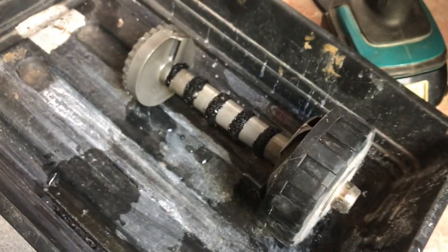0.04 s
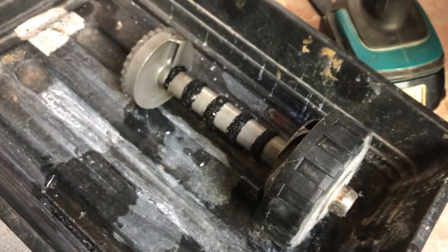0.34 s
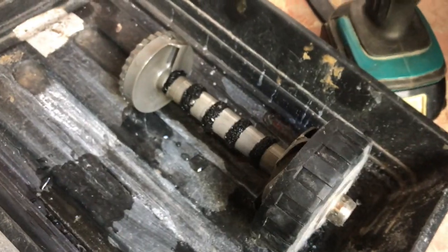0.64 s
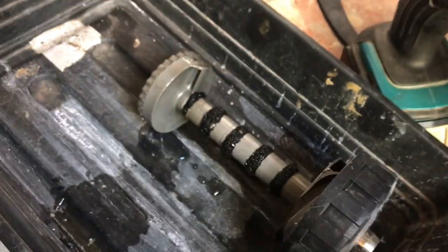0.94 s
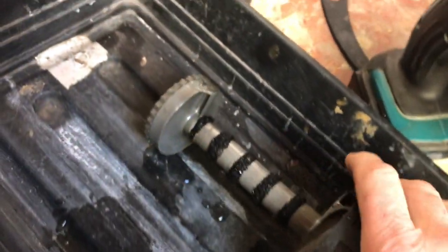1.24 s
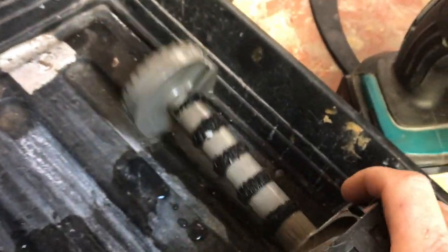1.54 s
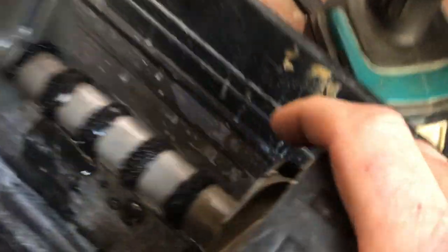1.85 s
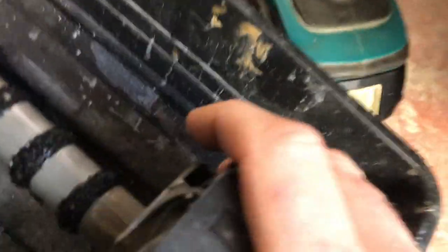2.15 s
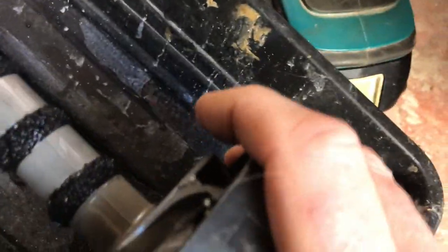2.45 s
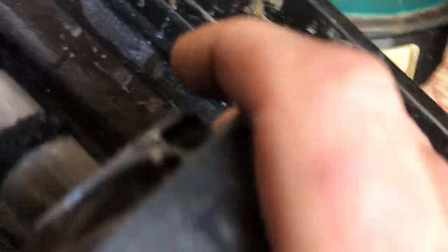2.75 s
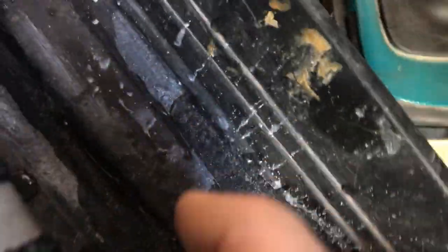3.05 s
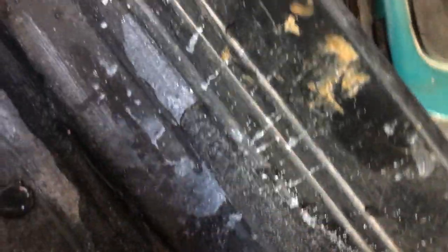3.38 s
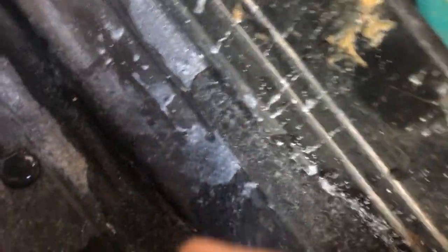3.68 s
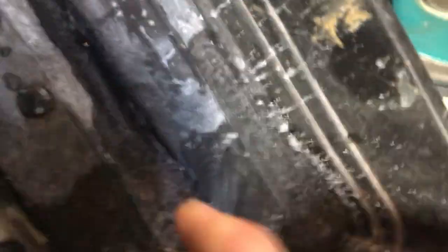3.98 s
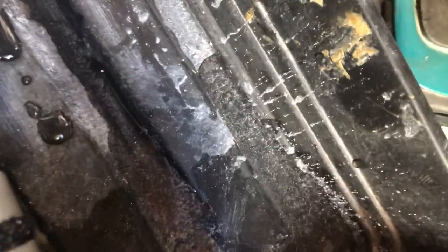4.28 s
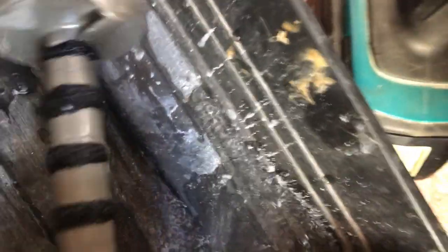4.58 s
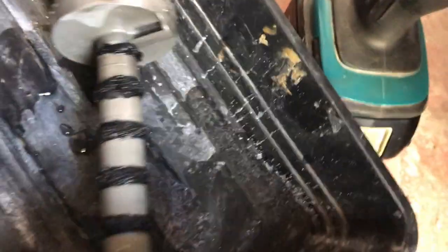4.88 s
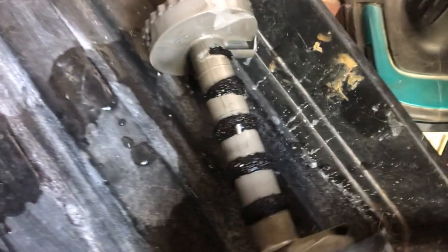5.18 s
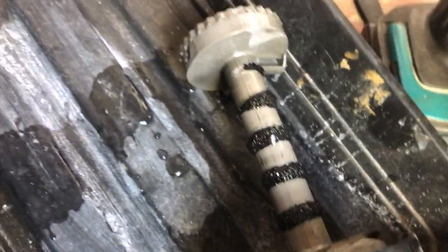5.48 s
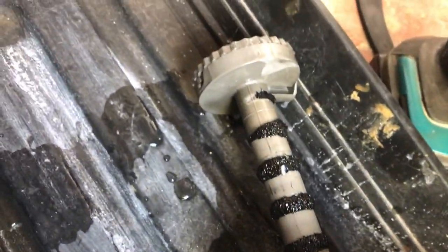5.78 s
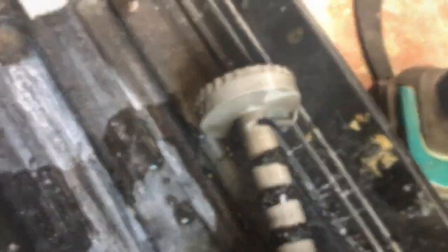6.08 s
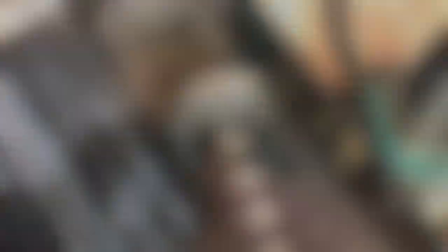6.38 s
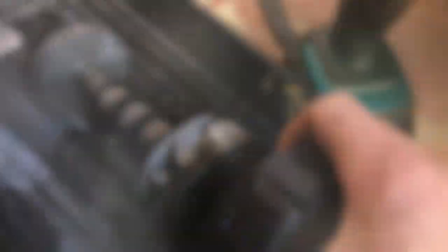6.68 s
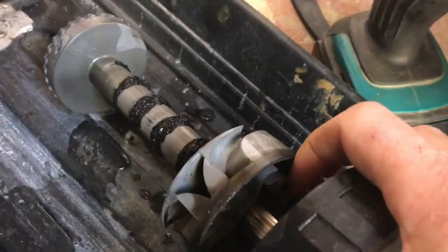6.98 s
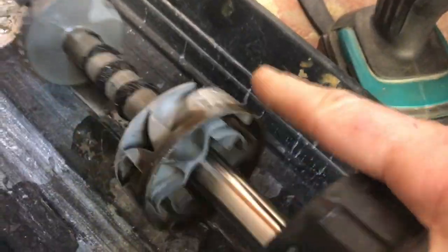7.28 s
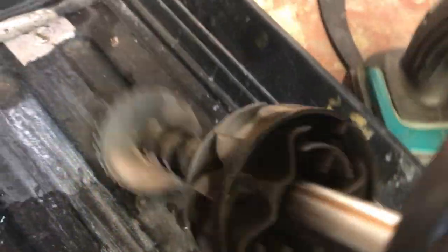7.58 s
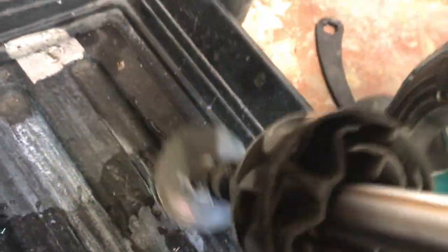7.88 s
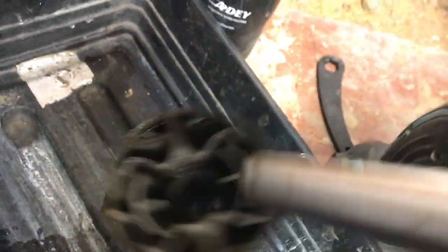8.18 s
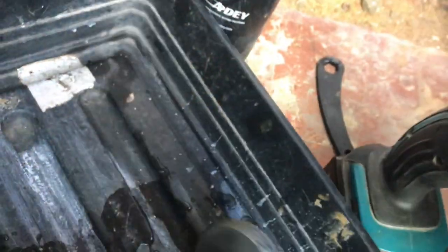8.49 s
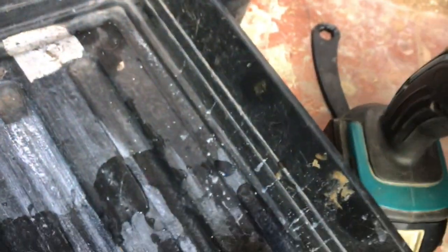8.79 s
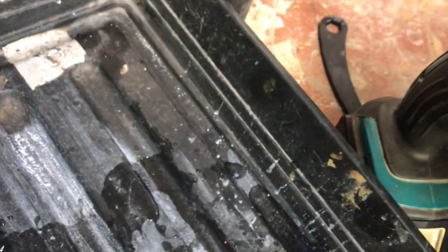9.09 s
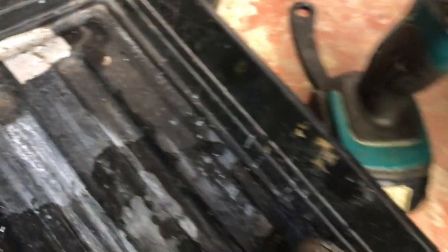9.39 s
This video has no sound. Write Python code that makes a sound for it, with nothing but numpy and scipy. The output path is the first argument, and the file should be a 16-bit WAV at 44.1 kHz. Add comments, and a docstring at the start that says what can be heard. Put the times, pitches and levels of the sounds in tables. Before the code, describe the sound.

Plastic and metal parts are pulled apart by hand, knocking, scraping and clattering in a hollow plastic tray.

```python
"""Hard parts knock and bounce in a wet plastic tray, whose walls thump and ring, as a filter's metal
shaft, toothed plastic wheel and cap are pulled apart by hand, close to the microphone.
The wheel taps hollowly as it rocks. Between the blows the parts slide, catch, rub, squeak and click.
A small room adds a short tail to the blows and a low rumble behind everything."""
import sys
import numpy as np
from scipy import signal
from scipy.fft import rfft, irfft
from scipy.io import wavfile
from scipy.ndimage import uniform_filter1d

SR = 44100
rng = np.random.default_rng(int(sys.argv[2]) if len(sys.argv) > 2 else 0)


def unload_wav(signal):
    """Save mono or channel-first audio to the path in sys.argv[1] as 16-bit WAV at rate SR, clipped to [-1, 1]."""
    wavfile.write(
        sys.argv[1],
        SR,
        np.round(np.clip(np.atleast_2d(signal).T, -1, 1) * 32767).astype(np.int16),
    )


N = 416304
TIME = np.arange(N) / SR

# Parts hitting the tray and each other. Thump (lows) and crack (highs) are added to the knock level.
# (time [s], knock level [dB], wall thump [dB], crack [dB])
BLOWS = [(1.498, -22.5, -16.5, -32), (2.034, -27, -2, -43.5), (2.502, -56, 10.5, -24),
         (3.332, -51, 15.5, -48), (3.843, -51.5, 11.5, -52), (3.9964, -11.5, -5.5, -29),
         (4.053, -14.5, -9.5, -32), (4.070, -15.5, -6.5, -28), (4.146, -14, -12.5, -32.5),
         (4.289, -18.5, -3.5, -31.5), (4.576, -13.5, -5, -32.5), (4.614, -10, -3, -33),
         (4.638, -9.5, -13.5, -27.5), (4.657, -15.5, -8.5, -27), (4.668, -3.5, -9, -50),
         (4.684, -6, -10.5, -20.5), (4.706, -11.5, -8, -27.5), (4.735, -14.5, -12, -42.5),
         (5.153, -18, -9.5, -22), (5.173, -12.5, -14, -20.5), (5.202, -12.5, -7, -22),
         (5.242, -21, -9, -25.5), (5.262, -20.5, -1, -26), (5.321, -19.5, -13.5, -12.5),
         (6.386, -27.5, -15.5, -39.5), (6.457, -32.5, -18, -42), (6.621, -24, -18.5, -28.5),
         (7.236, -25.5, -20.5, -51.5), (7.566, -15.5, -18, -40), (8.024, -32.5, -17.5, -11.5),
         (8.114, -22.5, -23.5, -21.5), (8.164, -7.5, -11.5, -18.5), (8.175, -6.5, -18, -22.5),
         (8.185, -7.5, -20, -26), (8.219, -21, -6, -28), (8.307, -5, -17, -16), (8.338, -10, -9, -29),
         (8.350, -11.5, -15.5, -27), (8.381, -8.5, -17, -21.5), (8.409, -15.5, -17, -29),
         (8.497, -14.5, -11, -20.5), (8.528, -24.5, -0.5, -8), (8.558, -9, -18, -27.5),
         (8.637, -24.5, 0, -22), (8.781, -31, 2.5, -45), (8.882, -28, -4, -8), (8.982, -14, -3, -9),
         (9.054, -14.5, -6.5, -23), (9.11, -6, -14, -31), (9.171, -27.5, -6.5, -34.5)]
# One blow, octave by octave. A fade time is how long a sound takes to drop by 60 dB.
# (frequency [Hz], level [dB], fade time of the part [s], fade time of tray and room [s])
BLOW_OCTAVES = [(79.8, -11.5, 0.12, 0.44), (180.8, -5.5, 0.05, 0.8), (358.4, -3.5, 0.1, 0.44),
                (750.7, -8, 0.043, 0.34), (1382, -8.5, 0.061, 0.19), (2628, -2.5, 0.039, 0.19),
                (5570, 2, 0.035, 0.085), (12060, -4, 0.032, 0.1)]


def blows(tail_db=-16, tone_db=7, spike=4.0, contact_s=0.0016, chatter=0.089, rebound_db=-15):
    """Each hit is a sharp spike and a short burst that shakes the tray; the low notes linger."""
    out, t = np.zeros(N), TIME[:SR // 5]
    times, knock_db, thump_db, crack_db = np.transpose(BLOWS)
    # harder blows rattle for longer and bounce back more strongly
    stretch = undb(chatter * (knock_db - knock_db.mean()))
    rebound_gain = undb(rebound_db) * stretch ** 2
    rebound_s = rng.uniform(.005, .016, len(times))
    tray_ring = tray(signal.unit_impulse(len(t)))
    for hz, db, part_fade_s, room_fade_s in BLOW_OCTAVES:
        decay = fade(t, part_fade_s * stretch[:, None])
        tail = undb(tail_db) * fade(t, room_fade_s)
        bursts = rng.standard_normal(decay.shape) * (decay + tail)
        bursts[:, 0] += spike
        # each spot favours one note per octave; plastic deadens the high ones to a dry clack
        note_hz = hz * 2 ** (rng.random((len(times), 1)) - .5)
        note = undb(tone_db) * np.sqrt(hz / SR) * np.cos(2 * np.pi * note_hz * t)
        bursts += note * decay / (1 + (note_hz / 3200) ** 4)
        # the lowest band reaches down into the deep bass
        low_hz = hz / 2 if hz == BLOW_OCTAVES[0][0] else hz / np.sqrt(2)
        high_hz = min(hz * np.sqrt(2), SR / 2 - 1)
        band = signal.butter(3, [low_hz, high_hz], "band", fs=SR, output="sos")
        body = signal.sosfilt(band, tray_ring)
        rings = signal.fftconvolve(bursts, body[None], axes=1)[:, :len(t)]
        peak_power = uniform_filter1d(rings ** 2, int(contact_s * SR), axis=1).max(axis=1)
        rings /= np.sqrt(peak_power)[:, None]
        # each blow's thump sets its low octaves; its crack sets the highs, the top octave most
        thump_share = np.interp(hz, [380, 680], [1, 0])
        crack_share = np.interp(hz, [800, 2880, 5760, 11520], [0, 0.58, 1, 1.15])
        gains = undb(db + knock_db + thump_share * thump_db + crack_share * crack_db)
        for k, start in enumerate(times):
            add(out, start, gains[k] * rings[k])
            other_spot = rings[k - len(times) // 2]
            add(out, start + rebound_s[k], gains[k] * rebound_gain[k] * other_spot)
    return out


# The notes of the tray with the parts in it. (pitch [Hz], width [Hz], level [dB])
TRAY_NOTES = [(125.4, 25, 13), (176, 26, 9.5), (234.7, 10, 9), (310, 75, 3.5), (611, 64, 7.5),
              (711.4, 8.4, 5.5), (776, 14, -0.5), (998, 240, -2), (1163, 15, 1.5)]


def tray(shaking):
    """The tray rings at its own notes on top of whatever shakes it."""
    ringing = sum(undb(db) * resonate(shaking, hz, hz / width) for hz, width, db in TRAY_NOTES)
    return tray_echo(shaking) + ringing


def tray_echo(sound, round_trip_s=.00285, trip_db=-10):
    """The upper midrange bounces between the tray's ends, weaker each trip, and sounds hollow."""
    upper = signal.lfilter(*signal.butter(1, [800, 5000], "band", fs=SR), sound)
    lag = int(round_trip_s * SR)
    echo = undb(trip_db) * signal.unit_impulse(lag + 1, lag)
    return sound + signal.lfilter(echo, signal.unit_impulse(lag + 1) - echo, upper)


# The toothed wheel rocking and jolting. (time [s], level [dB])
WHEEL_TAPS = [(4.787, -23.5), (4.847, -22.5), (4.874, -25.5), (4.933, -24.5), (4.959, -28), (5.004, -34.5),
              (5.265, -22), (5.294, -19), (5.439, -32.5), (7.328, -19.5), (7.384, -12), (7.475, -22.5),
              (7.677, -18), (8.351, -12), (8.44, -15), (8.511, -12), (8.677, -23.5)]
# The notes the wheel rings with. (pitch [Hz], level [dB])
WHEEL_NOTES = [(600, 5), (770, 10), (1100, 0.5), (1500, -11.5), (2150, -16), (3000, -21.5)]


def wheel_taps(ring_cycles=36, detune=0.063, spread_db=3.5, click_db=-10, click_fade_s=0.035):
    """The wheel rings hollow when it taps or catches; each spot gives a slightly different chord."""
    out, t = np.zeros(N), TIME[:SR // 5]
    hz, db = np.transpose(WHEEL_NOTES)
    dull = signal.butter(2, 2200, fs=SR)
    rocking = [(start, tap_db, 1) for start, tap_db in WHEEL_TAPS]
    for start, tap_db, pitch_ratio in rocking + catches():
        note_hz = pitch_ratio * rng.normal(hz, detune * hz)[:, None]
        notes = np.sin(2 * np.pi * note_hz * t) * fade(t, ring_cycles / note_hz)
        ring = undb(rng.normal(db, spread_db)) @ notes
        burst = rng.standard_normal(len(t)) * fade(t, click_fade_s)
        click = undb(click_db) * signal.lfilter(*dull, burst)
        add(out, start, undb(tap_db) * (ring / abs(ring).max() + click))
    return out


# The cap sliding off the shaft, one list per pull. (time [s], scrape level [dB], grit level [dB])
CAP_PULLS = [
    [(7.25, -56, -65.5), (7.31, -39.5, -47.5), (7.345, -22.5, -37.5), (7.385, -36.5, -41.5),
     (7.42, -41.5, -58), (7.5, -40.5, -59.5), (7.555, -66, -59)],
    [(7.558, -34, -51), (7.6, -36, -53.5), (7.655, -28.5, -40.5), (7.71, -36, -47.5), (7.75, -62, -68)],
]
# Parts sliding on the tray floor, one list as they are set down and one as they are lifted out.
# (time [s], scrape level [dB], grit level [dB])
FLOOR_SLIDES = [
    [(4.5, -51, -61), (4.77, -47, -56), (4.82, -53.5, -68.5), (5.4, -56.5, -67)],
    [(8.32, -40, -63), (8.562, -41, -66), (8.744, -46.5, -64), (9.28, -51, -74)],
]
# Short rubs of fingers and parts. (time [s], length [s], scrape level [dB], grit level [dB])
RUBS = [(0.635, 0.18, -64, -61.5), (0.818, 0.22, -61.5, -64), (1.28, 0.086, -62, -60.5),
        (1.312, 0.21, -53, -71.5), (1.468, 0.037, -33.5, -65), (3.362, 0.09, -55, -56.5),
        (3.779, 0.45, -63.5, -57.5), (4.532, 0.15, -28.5, -41.5), (6.862, 0.14, -57, -65.5),
        (8.877, 0.11, -51, -49.5), (8.949, 0.055, -31.5, -41), (9.092, 0.023, -24.5, -31.5)]
# The tone of the dull scrape. (frequency [Hz], level [dB])
SCRAPE_TONE = [(80, -20.5), (300, 4), (720, 8), (1200, 4), (2100, 0.5), (3100, -9.5), (6000, -14),
               (16000, -55.5)]
# The tone of the bright grit. (frequency [Hz], level [dB])
GRIT_TONE = [(1000, -3.5), (2500, 3.5), (5300, -3.5), (8000, -4.5), (16000, -9.5)]


def sliding(slips_per_s=1700, uneven_db=4.0, scrape_trim_db=-3, rasp_hz=5500, rasp_db=3):
    """Many tiny, uneven slips shake the tray while grit rasps where the plastic touches."""
    scrape_gain, grit_gain = np.zeros((2, N))
    for slide in [*CAP_PULLS, *FLOOR_SLIDES]:
        times, scrape_db, grit_db = np.transpose(slide)
        scrape_gain += undb(np.interp(TIME, times, scrape_db, left=-np.inf, right=-np.inf))
        grit_gain += undb(np.interp(TIME, times, grit_db, left=-np.inf, right=-np.inf))
    for start, length, scrape_db, grit_db in RUBS:
        stroke = np.hanning(int(length * SR))
        add(scrape_gain, start, undb(scrape_db) * stroke)
        add(grit_gain, start, undb(grit_db) * stroke)
    pressure = undb(uneven_db * wander(120))
    slips = (rng.random(N) < slips_per_s / SR) * rng.uniform(-1.3, 1, N) * pressure
    scrape = unit(tray(colour(slips, SCRAPE_TONE)))
    # the finest roughness blurs into a chattering hiss with one rasping note
    hiss = tray_echo(colour(rng.standard_normal(N) * pressure, GRIT_TONE))
    grit = unit(hiss + undb(rasp_db) * resonate(hiss, rasp_hz, sharpness=12))
    return undb(scrape_trim_db) * scrape_gain * scrape + grit_gain * grit


def catches(per_slide=36, boost_db=7, pull_rise_per_s=1.41):
    """Sliding parts snag again and again. Lists wheel taps as (time [s], level [dB], pitch [ratio])."""
    rows, first_pull_s = [], CAP_PULLS[0][0][0]
    for slides, rise in (CAP_PULLS, pull_rise_per_s), (FLOOR_SLIDES, 0):
        for slide in slides:
            times, scrape_db, _ = np.transpose(slide)
            progress = (np.arange(per_slide) + rng.random(per_slide)) / per_slide
            for start in times[0] + (times[-1] - times[0]) * progress:
                # louder with the scrape, and higher as the shaft draws out
                level_db = np.interp(start, times, scrape_db) + boost_db
                rows.append((start, level_db, 1 + rise * (start - first_pull_s)))
    return rows


# Edges catching and slipping. (time [s], length [s], pitch [Hz], level [dB])
SQUEAKS = [(2.61, 0.063, 1275, -59), (2.801, 0.093, 1175, -65.5), (4.609, 0.0052, 7750, -19.5),
           (7.367, 0.012, 5670, -27.5), (7.370, 0.016, 3015, -27.5), (8.173, 0.013, 4380, -15.5)]


def squeaks(jitter=0.16, overtone_db=-7):
    """An edge sticks and slips so fast that it gives a rough, high note."""
    out = np.zeros(N)
    for start, length, hz, db in SQUEAKS:
        count = int(length * SR)
        shaky_hz = hz * (1 + jitter * wander(3000)[:count])
        phase = 2 * np.pi * np.cumsum(shaky_hz) / SR
        swell = np.sin(np.pi * np.sqrt(np.arange(count) / count))
        add(out, start, undb(db) * swell * (np.sin(phase) + undb(overtone_db) * np.sin(2 * phase)))
    return out


# Light clicks of the parts, clear of the tray. (time [s], level [dB], ring compared with snap [dB])
CLICKS = [(1.73, -60.5, -17), (1.913, -48.5, -26), (2.855, -55, -32), (3.455, -62.5, -9.5),
          (5.692, -35, -44), (5.814, -36, -9.5), (5.968, -53.5, -19), (6.318, -57.5, -25),
          (6.666, -44.5, -26), (7.078, -57, -17.5), (7.952, -53.5, -14), (8.003, -41.5, -30),
          (8.287, -44.5, -5.5), (8.443, -44.5, -2), (8.675, -46.5, -7), (8.798, -46.5, -7),
          (8.822, -42, -6), (9.032, -45, -1), (9.212, -67, 13.5)]
# The notes a click rings with. (pitch [Hz], level [dB])
CLICK_NOTES = [(1580, 9), (1820, 14)]


def clicks(snap_fade_s=.055, ring_fade_s=0.054, tail_db=-22, tail_fade_s=0.11):
    """Parts touch lightly, giving a thin snap and a brief ring."""
    out, t = np.zeros(N), TIME[:SR // 4]
    thin = signal.butter(2, [1500, 13000], "band", fs=SR, output="sos")
    snap_decay = fade(t, snap_fade_s) + undb(tail_db) * fade(t, tail_fade_s)
    for start, db, ring_db in CLICKS:
        snap = signal.sosfilt(thin, rng.standard_normal(len(t)) * snap_decay)
        notes = sum(undb(note_db) * np.sin(2 * np.pi * hz * rng.normal(1, 0.016) * t)
                    for hz, note_db in CLICK_NOTES)
        add(out, start, undb(db) * (snap + undb(ring_db) * notes * fade(t, ring_fade_s)))
    return out


# The tone of the quiet room. (frequency [Hz], level [dB])
ROOM_TONE = [(20, -25), (62, 0), (120, -4), (170, -15), (300, -17), (900, -27), (2000, -37), (16000, -47)]


def room(rumble_db=-58, drone_hz=118, drone_db=-56, peak_s=1.0, width_s=0.64):
    """A low rumble under a faint hiss; early on a dull drone swells and fades."""
    drone = unit(resonate(colour(rng.standard_normal(N), ROOM_TONE), drone_hz, sharpness=4))
    swell = np.exp(-((TIME - peak_s) / width_s) ** 2)
    rumble = unit(colour(rng.standard_normal(N), ROOM_TONE))
    return undb(rumble_db) * rumble + undb(drone_db) * swell * drone


def undb(db):
    """Turn decibels into a number to multiply by."""
    return 10 ** (np.asarray(db) / 20)


def unit(sound):
    """Scale a sound to an average power of 1."""
    return sound / np.sqrt(np.mean(sound ** 2))


def add(track, start_s, sound):
    """Mix a sound into the track at a given time."""
    start = int(start_s * SR)
    track[start:start + len(sound)] += sound[:N - start]


def colour(sound, points):
    """Shape the tone along a curve of (frequency [Hz], level [dB]) points."""
    hz, db = np.transpose(points)
    all_hz = np.arange(N // 2 + 1) * SR / N
    return irfft(rfft(sound) * undb(np.interp(np.log(all_hz + 1), np.log(hz), db)), N)


def resonate(sound, hz, sharpness):
    """Keep what lies near one pitch; a sharper peak rings for longer."""
    return signal.lfilter(*signal.iirpeak(hz, sharpness, SR), sound)


def wander(steps_per_s):
    """Glide between random values, mostly within -1 to 1."""
    return np.interp(TIME * steps_per_s, np.arange(N // 20), rng.standard_normal(N // 20))


def fade(t, fade_s):
    """Die away by 60 dB every fade_s seconds."""
    return np.exp(-np.log(1000) * t / fade_s)


def scene():
    """The handled parts over the quiet room, in one channel."""
    return (blows() + wheel_taps() + clicks() + sliding() + squeaks() + room())[None]


def record(dry, peak_limit=.62, top_hz=16000, top_db=-5):
    """The microphone rounds the loudest peaks, softens the highest treble and cuts off the top."""
    rounded = peak_limit * np.tanh(dry[0] / peak_limit)
    soft = colour(rounded, [(12000, 0), (top_hz, top_db)])
    top_cut = signal.ellip(8, .2, 70, top_hz, fs=SR, output="sos")
    return signal.sosfilt(top_cut, soft)[None]


dry = scene()
out = record(dry)
unload_wav(out)
```